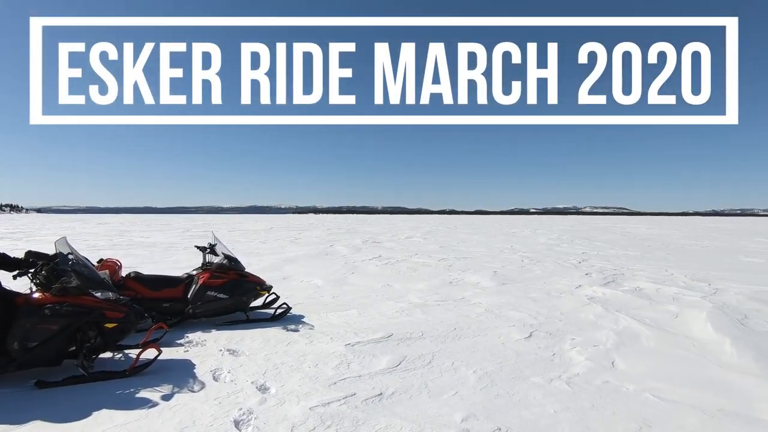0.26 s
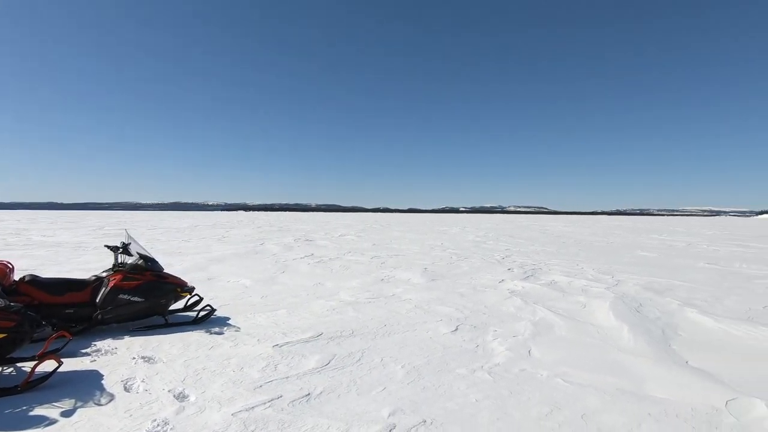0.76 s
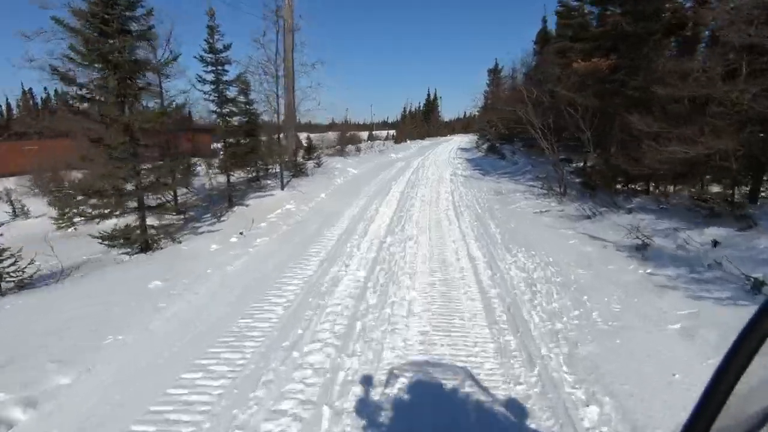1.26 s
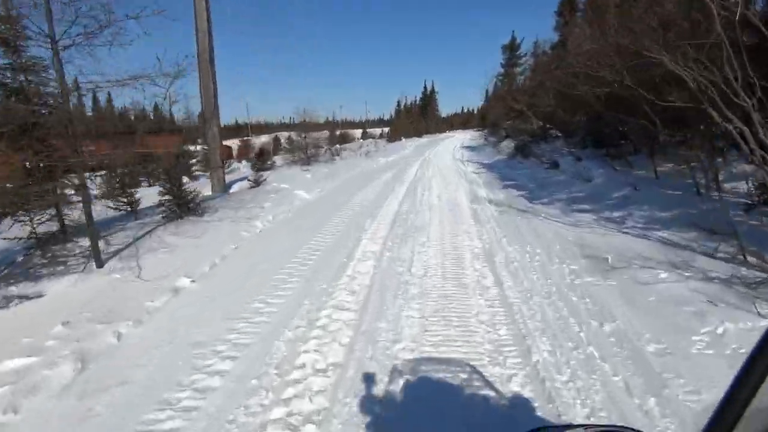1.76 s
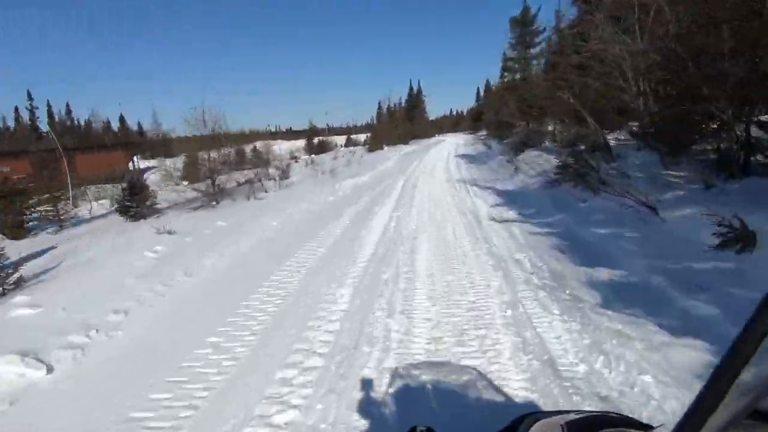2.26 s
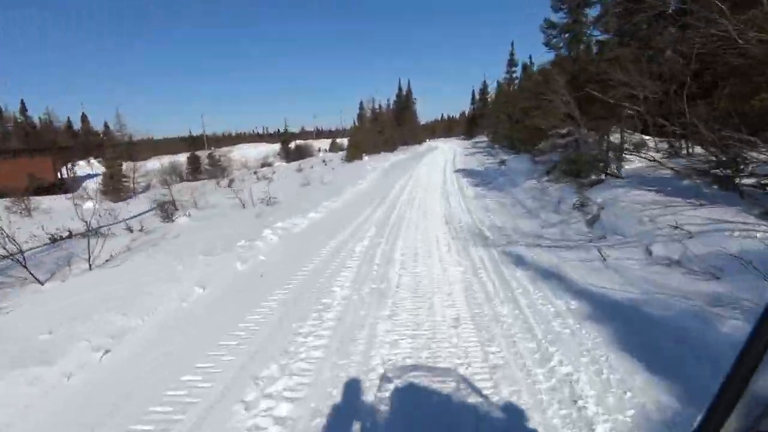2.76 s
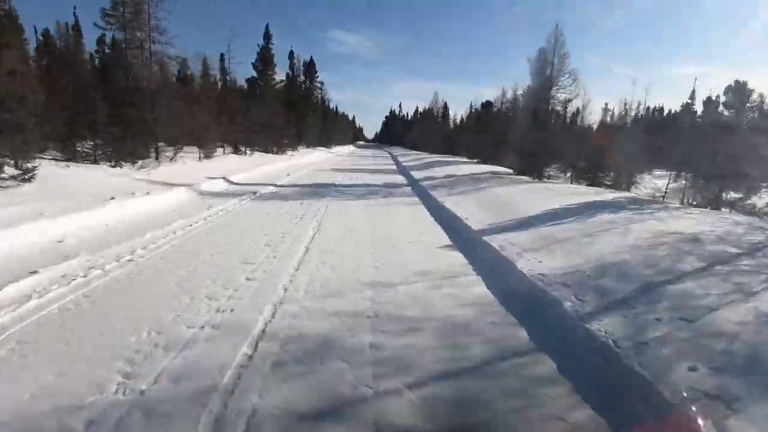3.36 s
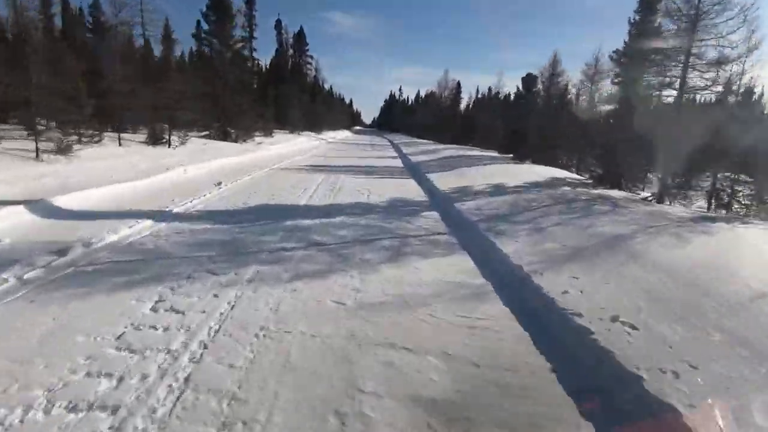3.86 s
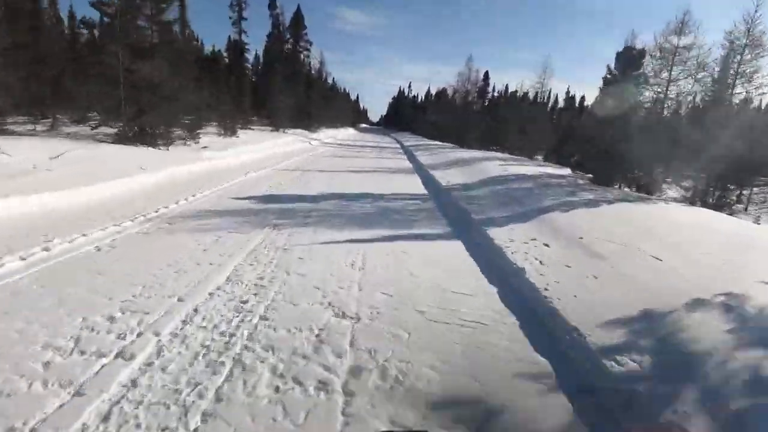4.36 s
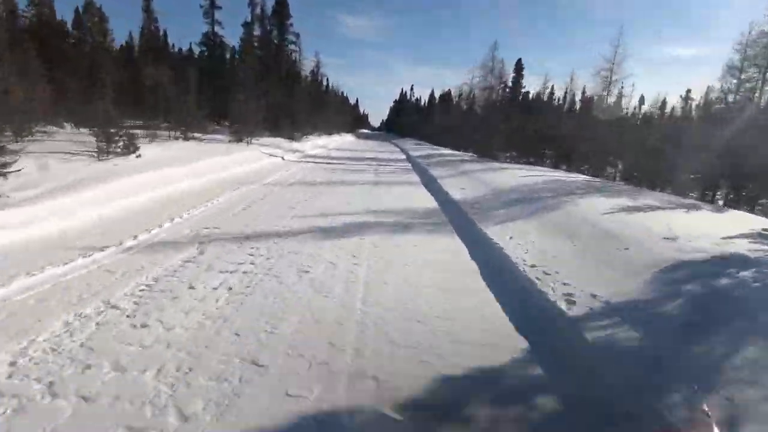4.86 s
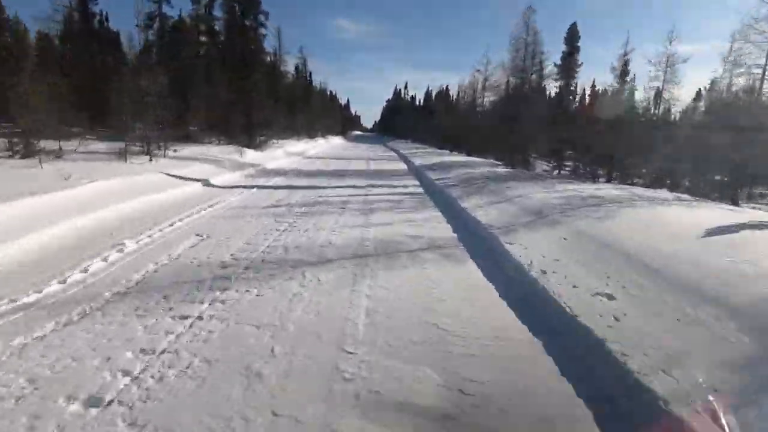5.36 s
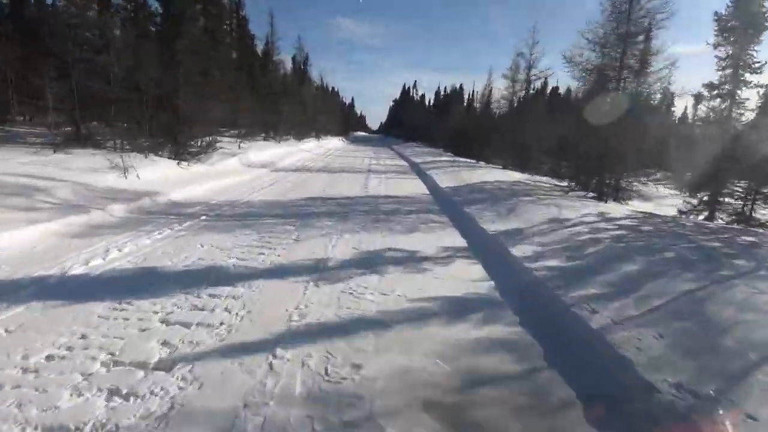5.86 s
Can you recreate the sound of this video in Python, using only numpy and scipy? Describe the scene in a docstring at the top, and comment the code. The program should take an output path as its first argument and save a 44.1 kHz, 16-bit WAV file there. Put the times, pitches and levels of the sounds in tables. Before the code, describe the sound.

Three outdoor snowmobile passages with hard cuts. First, a low fluttering idle heard close by, soft and dull. Then a very short gap and a rough trail ride, the exposed microphone battered by wind, irregular crunchy ski scrapes over a low engine hum. Last, a smoother run at constant speed: droning engine, deep chassis rumble, coarse track roar, sparse ice ticks, and a thin drive whine growing clearer midway.

```python
"""A frozen lake, then a packed snow trail: snowmobiles in three passages, a short silence after the first.
Parked on the ice, an engine idles: each firing sends a puff through the ringing muffler, with a thud.
On the trail, noise shaped by gusts buffets the microphone and the skis scrape over ridges of snow.
Last, a steady run: a drone built of engine orders, the roar and hiss of the track in filtered noise,
and a drive whine that climbs steadily."""
import sys
import numpy as np
from scipy import signal
from scipy.fft import rfft, irfft
from scipy.io import wavfile

SR = 44100
rng = np.random.default_rng(int(sys.argv[2]) if len(sys.argv) > 2 else 0)


def master_out(mix):
    """Clip the mix to full scale and print it as 16-bit PCM to the path in sys.argv[1]."""
    frames = np.transpose(np.atleast_2d(mix))
    ceiling = np.clip(frames, -1, 1)
    pcm = np.round(ceiling * 32767).astype(np.int16)
    wavfile.write(sys.argv[1], SR, pcm)


N = 269010
T = np.arange(N) / SR  # seconds
IDLE_END, RIDE_START, RUN_START = 1.0, 1.085, 3.166  # seconds


def amp(db):
    """Decibels to gain."""
    return 10 ** (np.asarray(db) / 20)


def unit(x):
    """Scales to rms 1."""
    return x / np.sqrt(np.mean(x ** 2) + 1e-20)


def curves(rows):
    """Each column of a table as a curve over the whole scene."""
    seconds, *columns = np.transpose(rows)
    return [np.interp(T, seconds, column) for column in columns]


def spectrum(points, hz):
    """Gain of a spectrum that falls away steeply beyond its ends."""
    f, db = np.transpose(points)
    octave = np.log2(hz + 1)
    beyond = abs(octave - np.clip(octave, np.log2(f[0]), np.log2(f[-1])))
    inside_db = np.interp(octave, np.log2(f), db)
    return amp(np.maximum(inside_db - 30 * beyond, -110))


def colour(x, points):
    """Passes x through a causal, minimum-phase filter with this spectrum; rms 1."""
    size = 8192
    log_gain = np.log(spectrum(points, abs(np.fft.fftfreq(size, 1 / SR))))
    response = np.exp(np.conj(signal.hilbert(log_gain)))
    ring = np.fft.ifft(response).real[:size // 2]
    fade = signal.windows.hann(size)[size // 2:]
    return unit(signal.oaconvolve(x, ring * fade)[:N])


def resonate(x, hz, width):
    """A resonance of gain 1 at hz, fixed or moving: shifted to 0 Hz, smoothed and shifted back."""
    turn = np.exp(2j * np.pi * np.cumsum(hz * np.ones(len(x))) / SR)
    r = np.exp(-np.pi * width / SR)
    smoothed = signal.lfilter([1 - r], [1, -r], x / turn + 1e-18)
    return 2 * (turn * smoothed).real


def low_pass(x, hz):
    """Takes off the treble above hz."""
    return signal.sosfilt(signal.butter(4, min(hz, SR / 3), fs=SR, output="sos"), x)


def noise():
    """White noise."""
    return rng.standard_normal(N)


def wander(hz):
    """Random motion of rms 1, mostly slower than hz."""
    size = 16384
    roll_off = 1 + (np.fft.rfftfreq(size, T[-1] / size) / hz) ** 4
    motion = irfft(rfft(rng.standard_normal(size)) / roll_off, size)
    return unit(np.interp(T, np.linspace(0, T[-1], size), motion))


def tone(turns, db, flutter_db, flutter_hz):
    """A partial of the given rms level whose strength flutters."""
    flutter = amp(flutter_db * wander(flutter_hz))
    return amp(db) * unit(flutter * np.sin(2 * np.pi * (turns + rng.random())))


def burst(s, db, t60):
    """Envelope of a blow: a quick rise and an exponential fall."""
    age = np.maximum(T - s + .001, 0)
    fall = amp(np.maximum(db - 60 * age / t60, -200))
    return fall * (1 - np.exp(-age / .001))


def swell(s, length):
    """A smooth hump of height 1 that crests at s."""
    return np.exp(-(2 * (T - s) / length) ** 2)


def step(s, seconds):
    """A smooth change from 0 to 1 around s."""
    return .5 + .5 * np.tanh((T - s) / seconds)


def since(s):
    """Seconds gone by since s."""
    return np.maximum(T - s, 0)


def passage(start, end):
    """Gate that opens at start and is shut at end, with edges of a millisecond."""
    return np.clip((T - start) / .001, 0, 1) * np.clip((end - T) / .001, 0, 1)


# Rings of the muffler. Each row: frequency in Hz, width in Hz, relative level in dB.
MUFFLER_RINGS = [(61.2, 13.4, 1), (128, 46, -13.5), (158, 18, -25), (241, 64, -8)]
# Low murmur of the shaking chassis. Each row: frequency in Hz, relative density in dB.
MURMUR_SPECTRUM = [(20, -17), (45, 2.5), (80, -8), (160, -3.5), (260, -9), (330, -15), (450, -30),
                   (900, -52)]
EXHAUST_DB, EXHAUST_DB_PER_S = -31, 3.4  # the exhaust slowly grows louder


def idle_exhaust(turns):
    """Each firing sends out a puff whose changing flow makes the pressure that rings the muffler."""
    firings = np.diff(np.floor(turns), prepend=0) * amp(1.6 * wander(30))
    puff_seconds = 0.0016
    flow = signal.oaconvolve(firings, signal.windows.gaussian(1001, puff_seconds * SR), "same")
    puffs = np.gradient(flow)  # pressure follows the change of flow
    rings = sum(amp(db + 10.0) * resonate(puffs, hz, width) for hz, width, db in MUFFLER_RINGS)
    thuds = unit(puffs + rings)
    murmur = amp(-16.5) * colour(noise(), MURMUR_SPECTRUM)
    return amp(EXHAUST_DB + EXHAUST_DB_PER_S * T) * (thuds + murmur)


# Rattle of the engine case. Each row: frequency in Hz, relative density in dB.
CLATTER_SPECTRUM = [(300, 10.5), (480, 3), (700, -3.5), (1100, -5), (1450, -3.5), (2000, -11.5),
                    (2400, -24), (3600, -29), (4500, -21.5), (5400, -14), (6200, -22.5), (7400, -35),
                    (9600, -44), (15000, -51)]
CLATTER_DB, CLATTER_DB_PER_S = -53.5, -4  # the clatter recedes


def idle_clatter(turns):
    """The engine case rattles a little harder just after each firing."""
    shaking = (1 + 0.3 * np.exp(-(turns % 1) / .25)) * amp(0.73 * wander(90))
    return amp(CLATTER_DB + CLATTER_DB_PER_S * T) * colour(noise() * shaking, CLATTER_SPECTRUM)


# Soft rustles beside the sled. Each row: time in seconds, strength in dB.
RUSTLE_TIMES = [(0.116, -62), (0.147, -45), (0.323, -52), (0.353, -57), (0.424, -50.5), (0.464, -48.5),
                (0.533, -50)]


def idle_rustles():
    """Short puffs of dull noise that die away."""
    envelope = sum(burst(s, db, t60=0.11) for s, db in RUSTLE_TIMES)
    return envelope * colour(noise(), [(400, -1.0), (750, 5), (1100, -12), (2000, -31)])


# Idle speed. Each row: time in seconds, firings per second.
IDLE_SPEED = [(0, 32), (.1, 32), (.22, 31.4), (.38, 32.3), (.48, 33.6), (.62, 31.6), (.74, 33.1),
              (.87, 32.4), (1, 29.4)]


def idle():
    """One uneven run of firings drives both the exhaust and the clatter; rustles lie beside them."""
    rate, = curves(IDLE_SPEED)
    turns = np.cumsum(rate) / SR + .28
    return idle_exhaust(turns) + idle_clatter(turns) + idle_rustles()


# Large eddies thumping the microphone. Each row: frequency in Hz, relative density in dB.
BUFFET_SPECTRUM = [(15, -4.5), (28, -7.5), (50, 3.5), (100, 0), (150, -1), (185, -6.5), (250, -7.5),
                   (310, -11.5), (400, -29), (800, -53)]
# Hard wind tearing at the microphone. Each row: frequency in Hz, relative density in dB.
TEARING_SPECTRUM = [(130, -11.5), (250, 2), (360, 4), (430, -12.5), (530, -0.5), (720, -7), (1000, -13),
                    (1800, -27.5)]
# Rush of air. Each row: frequency in Hz, relative density in dB.
RUSH_SPECTRUM = [(100, -2.5), (250, -5), (360, 0.5), (430, 3.5), (540, -2.5), (800, 3), (1200, -2.5),
                 (1900, -5), (2600, -20.5), (3600, -43), (6000, -40), (7500, -44), (10000, -75)]
RUSH_DB, RUSH_GROWTH = -37.5, 0.97  # rush between gusts at the usual wind, and its dB per dB of wind


def ride_wind(wind_db, extra_db, gusting, eddies):
    """Large eddies thump the microphone, small ones tear into rough bursts and air rushes by."""
    buffet = amp(wind_db - 2.0) * colour(noise(), BUFFET_SPECTRUM)
    # small eddies grow faster than large ones
    tearing = amp(2 * wind_db + 0.6) * colour(noise() * eddies, TEARING_SPECTRUM)
    rush_level = np.hypot(amp(RUSH_DB + RUSH_GROWTH * extra_db), gusting)
    return buffet + tearing + rush_level * colour(noise() * eddies, RUSH_SPECTRUM)


# Small ridges come at random, harder in a stronger headwind; the level is for the usual wind, in dB
RIDGES_PER_S, RIDGE_DB, RIDGE_SPREAD_DB = 5.7, -25.5, 5.5
RIDGE_HZ, RIDGE_S = 1150, 0.0036  # middle of the pitch range, length of the scrape


def small_ridges(extra_db):
    """Faint scrapes at random moments, as rows like those of the large ridges."""
    ride_seconds = RUN_START - RIDE_START
    draws = rng.random((60, 3))
    rows = []
    for when, strength, pitch in draws[:round(RIDGES_PER_S * ride_seconds)]:
        s = RIDE_START + when * ride_seconds
        db = RIDGE_DB + RIDGE_SPREAD_DB * (2 * strength - 1) + extra_db[round(s * SR)]
        rows.append((s, db, RIDGE_HZ * 2 ** (pitch - .5), RIDGE_S))
    return rows


JOLT_DB, JOLT_HZ, JOLT_WIDTH_HZ = 4, 62, 50  # each ridge also thumps the chassis


def scrapes(rows):
    """A ski rides over a ridge: the crush of snow swells and lets go, each time with its own hollow colour."""
    force, hollow = np.zeros(N), np.zeros(N)
    age, grit = np.arange(SR // 8) / SR, noise()
    for s, db, hz, length in rows:
        part = slice(round(s * SR), round(s * SR) + len(age))
        progress = age / (length / 2)  # 1 at the height of the crush
        crush = progress * np.exp((1 - progress ** 2) / 2)
        loose_snow = amp(-13) * np.exp(-age / 0.019) * (1 - np.exp(-age / 0.0037))
        push = amp(db) * (crush + loose_snow)
        force[part] += push
        hollow[part] += push * unit(resonate(grit[part], hz, width=500))
    crunch = [(150, -17.5), (500, 7.5), (1200, 9), (1900, 0.5), (3000, -17.0), (4200, -16.5),
              (6000, -21.0), (7500, -39.0), (10000, -52.0)]
    thump = resonate(force, JOLT_HZ, JOLT_WIDTH_HZ)
    jolt = amp(JOLT_DB) * resonate(thump, JOLT_HZ, JOLT_WIDTH_HZ)
    return jolt + amp(-7.0) * force * colour(noise(), crunch) + amp(-10.5) * low_pass(hollow, 2720)


def sliding(rows, width):
    """Friction noise in a gliding resonance."""
    hz, db = curves(rows)
    glide = resonate(resonate(noise(), hz, width), hz, width)
    return amp(db) * unit(low_pass(glide, 4800))


# Skis on large ridges. Each row: time in seconds, force in dB, centre in Hz, length of the scrape in seconds.
LARGE_RIDGES = [(1.143, -24.5, 1100, 0.011), (1.179, -16.5, 1200, 0.0054), (1.231, -19, 1100, 0.0088),
                (1.297, -19.5, 1090, 0.011), (1.438, -18.5, 1400, 0.025), (1.558, -16, 900, .006),
                (1.615, -15, 1040, 0.0078), (1.687, -18, 1090, 0.0065), (1.776, -14, 965, 0.0065),
                (1.899, -18, 890, .005), (1.931, -19, 900, 0.0027), (1.981, -19.5, 880, 0.0052),
                (2.199, -19, 1150, 0.0025), (2.239, -26, 660, 0.007), (2.267, -15.5, 820, 0.0088),
                (2.308, -19.5, 1000, 0.013), (2.361, -16.5, 1410, 0.013), (2.393, -16.5, 1200, 0.0097),
                (2.425, -20, 1095, 0.0064), (2.483, -23.5, 2800, .009), (2.527, -20, 1400, 0.0093),
                (2.619, -15.5, 1330, 0.0083), (2.708, -22.5, 1200, 0.0058), (2.85, -23.5, 1800, 0.026),
                (2.991, -14, 1321, 0.0062), (3.072, -21, 1310, 0.012), (3.116, -13, 1000, .004),
                (3.129, -16.5, 1525, 0.02)]
# A runner squeaks briefly on hard snow. Each row: time in seconds, pitch in Hz, level in dB.
RUNNER_SQUEAK = [(2.535, 1835, -80), (2.553, 1770, -28.5), (2.575, 1620, -32), (2.6, 1610, -34),
                 (2.62, 1650, -64)]
# Along with the squeak it swishes, and for longer, mostly rising in pitch.
# Each row: time in seconds, pitch in Hz, level in dB.
RUNNER_SWISH = [(2.52, 3930, -86), (2.56, 4000, -47), (2.7, 4100, -53), (2.8, 4440, -48), (2.9, 5080, -50),
                (3, 4730, -64)]


def ride_skis(extra_db):
    """The skis scrape over large and small ridges; a runner squeaks and swishes by friction."""
    ridges = scrapes(LARGE_RIDGES + small_ridges(extra_db))
    return ridges + sliding(RUNNER_SQUEAK, width=440) + sliding(RUNNER_SWISH, width=1300)


# Firing tones. Each row: multiple of the cycle rate, level in dB relative to the engine level.
RIDE_PARTIALS = [(2, -8), (3, -2), (4, -11), (6, -15), (8, -14), (9, -11)]
# Engine on the trail. Each row: time in seconds, engine cycles per second, engine level in dB.
RIDE_SPEED = [(1.085, 29.5, -27.5), (1.45, 39, -23.5), (1.64, 33, -28), (1.85, 35, -22), (2, 33.6, -21.5),
              (2.14, 33, -20.5), (2.35, 34, -24), (2.85, 32.8, -27), (3.16, 32.7, -21.5)]


def ride_engine():
    """The engine hums underneath in a few fluttering orders of an unsteady cycle rate."""
    rate, engine_db = curves(RIDE_SPEED)
    turns = np.cumsum(rate * (1 + 0.0059 * wander(6.9))) / SR
    return sum(tone(k * turns, engine_db + db, flutter_db=-3.5, flutter_hz=18.0) for k, db in RIDE_PARTIALS)


# Snow crushed under the sled. Each row: frequency in Hz, relative density in dB.
CRUNCH_SPECTRUM = [(1400, -12), (2400, 10.5), (3050, 1.5), (3700, -0.5), (4500, -24), (8000, -28)]
# Snow hissing along the skis. Each row: frequency in Hz, relative density in dB.
HISS_SPECTRUM = [(2000, -16), (3300, -2.5), (4300, 7.5), (5400, 8.5), (6300, 2), (7100, -9), (8500, -12.5),
                 (10500, -37), (15000, -48.5)]
CRUNCH_DB, CRUNCH_GROWTH = -56.5, 2.3  # crunch at the usual wind, and its dB per dB of wind
CRUST_AT_S, CRUST_S, CRUST_DB = 1.74, 0.46, -47  # a stretch of crusted snow adds to the crunch
SNOW_DB, HARD_SNOW_DB, HARD_SNOW_S = -56, -52, 2.53  # the hiss between gusts steps up on hard snow


def ride_snow(extra_db, gusting, eddies):
    """Crushed snow crunches in rough grains and loose snow hisses; both swell with the gusts."""
    grains = noise() * eddies * amp(2.2 * wander(900))
    crust = amp(CRUST_DB) * swell(CRUST_AT_S, CRUST_S)
    steady_crunch = amp(CRUNCH_DB + CRUNCH_GROWTH * extra_db) + crust
    crunch = np.hypot(steady_crunch, amp(-21) * gusting) * colour(grains, CRUNCH_SPECTRUM)
    hiss_db = SNOW_DB + (HARD_SNOW_DB - SNOW_DB) * step(HARD_SNOW_S, seconds=0.013)
    hiss_level = np.hypot(amp(hiss_db), amp(-26.5) * gusting)
    return crunch + hiss_level * colour(noise() * amp(1.8 * wander(120)), HISS_SPECTRUM)


# Headwind at the microphone. Each row: time in seconds, strength in dB.
HEADWIND = [(1.085, -17), (1.42, -16), (1.52, -10.5), (1.64, -13.5), (1.74, -12), (1.82, -16.5),
            (1.92, -17), (2.04, -19), (2.25, -14.5), (2.4, -17), (2.54, -15.5), (2.72, -20), (2.92, -18.5),
            (3.16, -18)]
# Gusts that swell and die away. Each row: crest in seconds, length in seconds, crest of the air rush in dB.
GUST_SWELLS = [(1.294, 0.24, -29), (1.51, 0.21, -27.5), (1.7, 0.11, -32), (1.883, 0.044, -36.5),
               (2.317, 0.11, -27), (2.84, 0.24, -30), (3.009, 0.066, -29), (3.112, 0.065, -28.5)]
USUAL_WIND_DB = -17
FADE_IN_DB, FADE_IN_S = -39, 0.025  # the ride fades in from near silence


def ride():
    """One headwind with its gusts and eddies drives wind and snow; skis and engine join in."""
    wind_db, = curves(HEADWIND)
    extra_db = wind_db - USUAL_WIND_DB
    gusting = sum(amp(db) * swell(s, length) for s, length, db in GUST_SWELLS)
    eddies = amp(1.22 * wander(58) + 2.4 * wander(350))
    wind = ride_wind(wind_db, extra_db, gusting, eddies)
    snow = ride_snow(extra_db, gusting, eddies)
    fade_in = amp(FADE_IN_DB * np.exp(-since(RIDE_START) / FADE_IN_S))
    return fade_in * (wind + ride_skis(extra_db) + ride_engine() + snow)


EASE_AT_S, EASE_S = 4.08, 0.037  # the engine's load eases and the drive starts to sing

# Steady engine speed. Each row: time in seconds, engine cycles per second.
RUN_SPEED = [(3.17, 38.4), (3.5, 38.35), (3.85, 38.2), (4.6, 38.8), (5.1, 39.05), (6.1, 39.4)]
# Exhaust drone. Each row: time in seconds, second order in dB, third order in dB.
DRONE_LEVELS = [(3.17, -26, -29.5), (3.45, -19.5, -22.5), (3.7, -26, -19), (4.05, -27, -22),
                (4.35, -22.5, -20), (5, -21.5, -27.5), (5.45, -19, -24.5), (6.1, -26.5, -25.5)]
# Orders that ring out under load. Each row: multiple of the cycle rate, level under load in dB.
LOADED_PARTIALS = [(12, -38.5), (23, -39), (24, -35), (26, -37), (27, -42), (30, -43), (36, -40), (37, -36),
                   (41, -48)]
EASED_DB = -9  # their drop once the load has eased
# The comb of other orders falls with every octave above the cycle rate
COMB_DB, COMB_DB_PER_OCTAVE, COMB_SPREAD_DB = -30, -4.5, 0.44
PIPE_HZ, PIPE_WIDTH_HZ, PIPE_DB = 813, 70, 9.5  # an exhaust pipe resonance lifts the orders near it


def run_engine():
    """A droning exhaust over a comb of fainter orders; a few ring out until the load eases."""
    rate, = curves(RUN_SPEED)
    second_db, third_db = curves(DRONE_LEVELS)
    turns = np.cumsum(rate * (1 + .001 * wander(10))) / SR
    uneven = turns + .012 * wander(16)  # no two cycles are quite alike
    drone = sum(tone(k * uneven, db, flutter_db=2, flutter_hz=14) for k, db in [(2, second_db), (3, third_db)])
    comb = np.zeros(N)
    for k in range(4, 25):
        pipe_db = PIPE_DB / (1 + ((k * rate - PIPE_HZ) / PIPE_WIDTH_HZ) ** 2)
        db = COMB_DB + COMB_DB_PER_OCTAVE * np.log2(k) + COMB_SPREAD_DB * rng.standard_normal()
        comb += tone(k * turns, db + pipe_db, flutter_db=4, flutter_hz=4.3)
    load_db = EASED_DB * step(EASE_AT_S, seconds=0.59)
    ringing = sum(tone(k * turns, db, flutter_db=3.5, flutter_hz=14) for k, db in LOADED_PARTIALS)
    return drone + comb + amp(load_db) * ringing


# Track on packed snow. Each row: frequency in Hz, relative density in dB.
ROAR_SPECTRUM = [(200, -13.5), (420, -2), (550, 2), (700, -0.5), (880, 2), (1150, -0.5), (1430, -0.5),
                 (1560, -7.5), (1920, -7), (2200, -19.5), (2600, -29.5), (3300, -47.5), (5000, -47.5)]
# Shaking chassis. Each row: frequency in Hz, relative density in dB.
RUMBLE_SPECTRUM = [(15, -23.5), (28, -5), (45, -8.5), (65, -10), (88, 12), (125, 1), (155, -2), (200, -3.5),
                   (225, -4), (265, -3), (320, -3.5), (420, -15.5), (800, -39.5)]
RUMBLE_DB, ROAR_DB = -21, -28  # outside the surge
# Early in the run the track surges briefly: rumble and roar swell by different amounts
SURGE_AT_S, SURGE_S, SURGE_RUMBLE_DB, SURGE_ROAR_DB = 3.29, 0.52, 2, 3


def run_track():
    """The chassis rumbles in deep noise and the track roars roughly over packed snow."""
    surge = swell(SURGE_AT_S, SURGE_S)
    rumble = amp(RUMBLE_DB + SURGE_RUMBLE_DB * surge) * colour(noise(), RUMBLE_SPECTRUM)
    rough = noise() * amp(1.5 * wander(150))
    return rumble + amp(ROAR_DB + SURGE_ROAR_DB * surge) * colour(rough, ROAR_SPECTRUM)


# Whine and track hum each climb steadily, the whine by the larger share
WHINE_HZ, WHINE_HZ_PER_S, LUG_HZ, LUG_HZ_PER_S = 1312, 34, 255, 3.7
WHINE_LOADED_DB, WHINE_EASED_DB = -43, -30.5
LUG_DB, LUG_DB_PER_S = -28.5, -1.5


def run_drive():
    """The chain drive whines ever higher; the track lugs hum and the sprocket throbs once for every six."""
    age = since(RUN_START)
    unsteady = 1 + .0007 * wander(25) + .001 * wander(3)
    turns = np.cumsum((WHINE_HZ + WHINE_HZ_PER_S * age) * unsteady) / SR
    whine_db = WHINE_LOADED_DB + (WHINE_EASED_DB - WHINE_LOADED_DB) * step(EASE_AT_S, EASE_S)
    whine = tone(turns, whine_db + 1.2 * wander(3.7), flutter_db=0.6, flutter_hz=25)
    lug_turns = np.cumsum(LUG_HZ + LUG_HZ_PER_S * age) / SR + .07 * wander(14)
    lugs = tone(lug_turns, LUG_DB + LUG_DB_PER_S * age, flutter_db=3.0, flutter_hz=9.5)
    sprocket = tone(lug_turns / 6, db=-33, flutter_db=5.5, flutter_hz=4.8)
    return whine + lugs + sprocket


# Thrown snow. Each row: frequency in Hz, relative density in dB.
SPRAY_SPECTRUM = [(2300, -16), (2800, -16.5), (3400, -19), (4200, -9), (5100, -3.5), (5450, -1), (6200, -8),
                  (7100, -20), (8500, -24), (9600, -33), (11300, -41.5)]
SPRAY_DB = -46


def run_spray():
    """Snow thrown up by the track hisses with a quick flicker."""
    return amp(SPRAY_DB) * colour(noise() * amp(1.0 * wander(120)), SPRAY_SPECTRUM)


# Bits of ice ticking on the chassis. Each row: time in seconds, strength in dB.
ICE_TICKS = [(3.379, -32), (3.846, -33), (4.061, -33), (4.204, -30), (4.345, -33), (4.485, -34),
             (4.55, -32), (4.617, -35), (4.77, -35), (5.887, -32)]
PATTER_AT_S, PATTER_S, PATTER_DB = 4.6, 1.1, -59.5  # a stretch where crumbs of ice patter, before flicker


def run_ice():
    """Bits of ice tick as short noise bursts over a faint, flickering patter."""
    patter = amp(PATTER_DB + 4 * wander(60)) * swell(PATTER_AT_S, PATTER_S)
    ticks = patter + sum(burst(s, db, t60=0.015) for s, db in ICE_TICKS)
    return ticks * colour(noise(), [(1200, -10), (2200, 2.5), (3000, -4.5), (4200, -10.5), (6500, -6), (9000, -27)])


# Very high hiss. Each row: frequency in Hz, relative density in dB.
HIGH_HISS_SPECTRUM = [(10500, -46), (11400, -18), (11900, 7), (12700, 5), (14000, -0.5), (15700, -15.5)]
HIGH_HISS_DB = -78.5  # once settled
HIGH_HISS_START_DB, HIGH_HISS_SETTLE_S = 15.5, .35  # how much stronger it starts, and its time constant


def run_high_hiss():
    """A very high hiss, stronger at the start of the run and quickly settling."""
    hiss_db = HIGH_HISS_DB + HIGH_HISS_START_DB * np.exp(-since(RUN_START) / HIGH_HISS_SETTLE_S)
    return amp(hiss_db) * colour(noise(), HIGH_HISS_SPECTRUM)


def scene():
    """Idle, ride and run in a row, with a short silence after the idle."""
    parked = idle() * passage(0, IDLE_END)
    riding = ride() * passage(RIDE_START, RUN_START)
    running = run_engine() + run_track() + run_drive() + run_spray() + run_ice() + run_high_hiss()
    return (parked + riding + running * passage(RUN_START, T[-1]))[None]


def record(dry):
    """Rounds off the loudest peaks, then takes away the treble above the band edge."""
    ceiling, edge_hz = .6, 15700
    held = dry / (1 + (dry / ceiling) ** 8) ** (1 / 8)
    band = signal.firwin(511, edge_hz, window=("kaiser", 9), fs=SR)
    return signal.oaconvolve(held, band[None], "same")


dry = scene()
out = record(dry)
master_out(out)
```